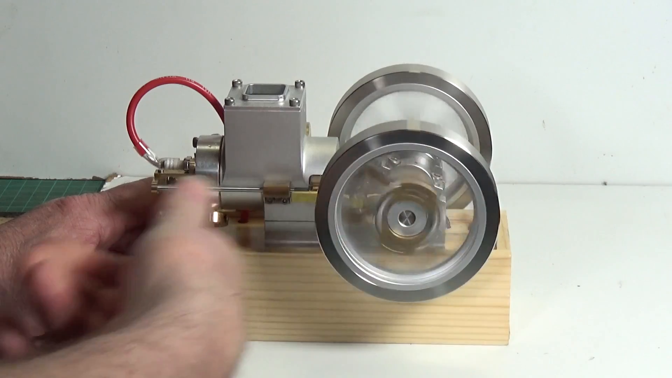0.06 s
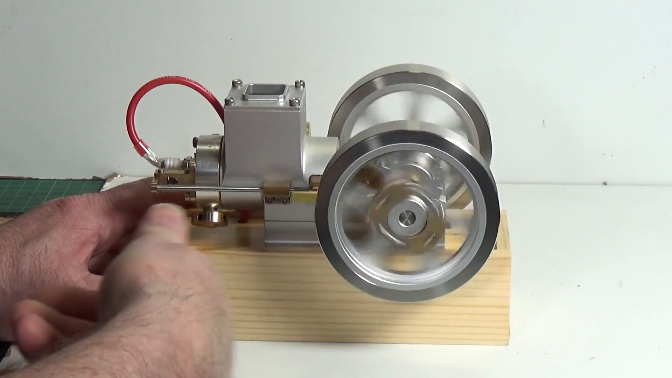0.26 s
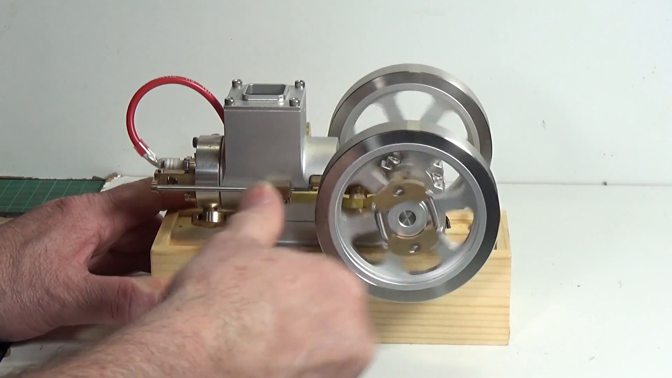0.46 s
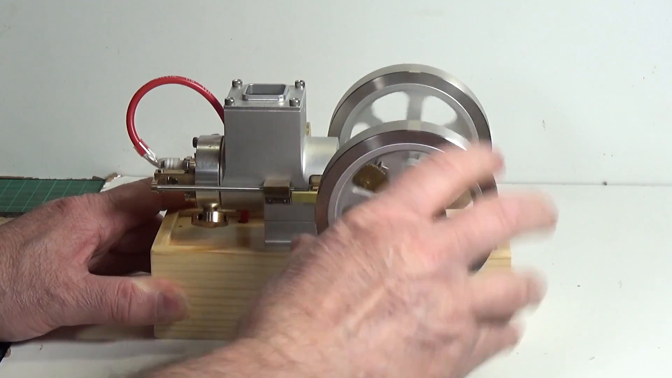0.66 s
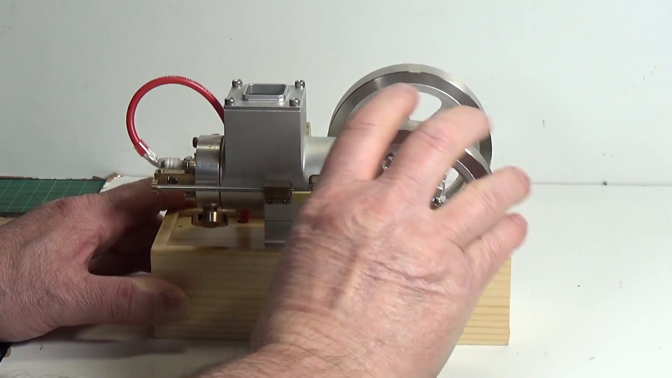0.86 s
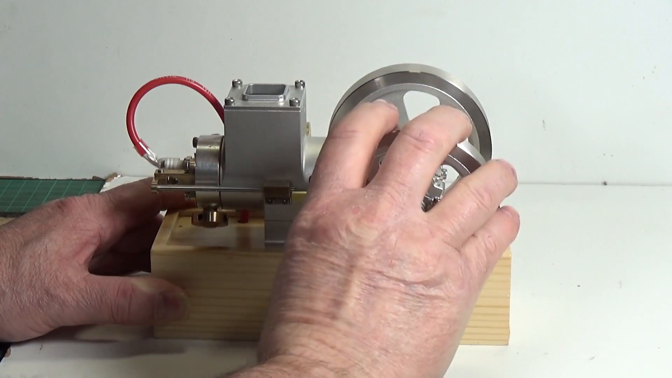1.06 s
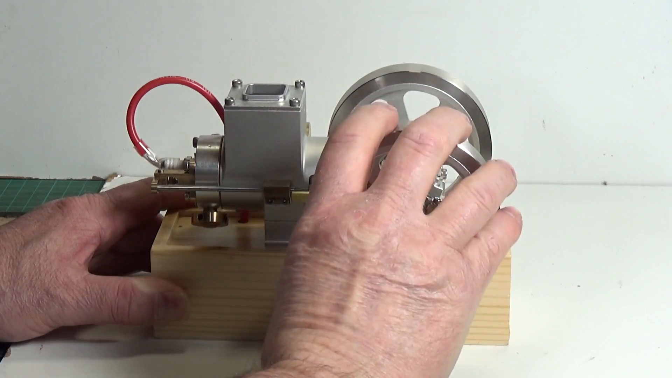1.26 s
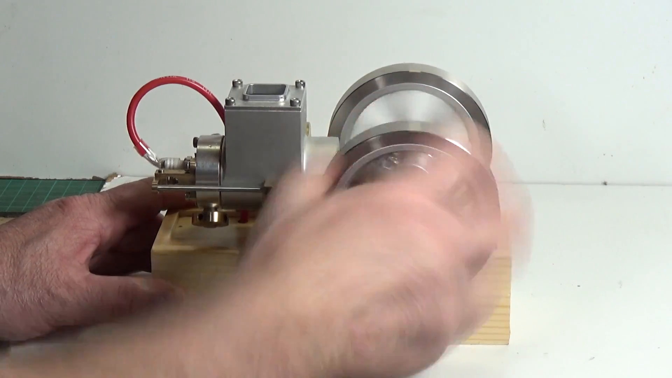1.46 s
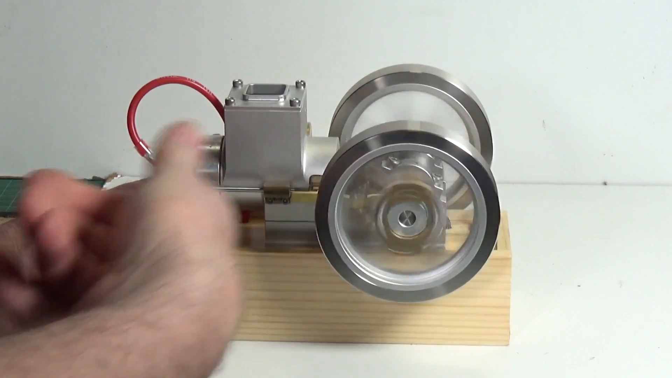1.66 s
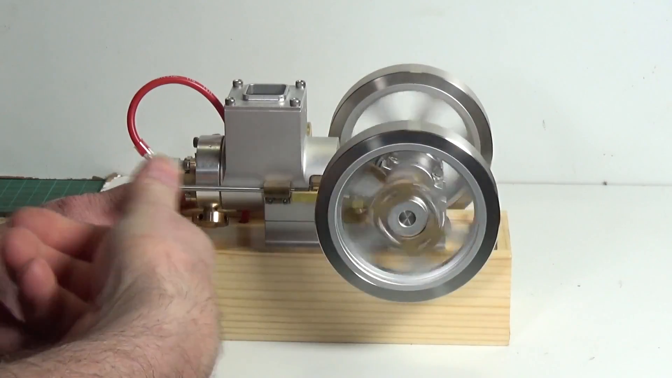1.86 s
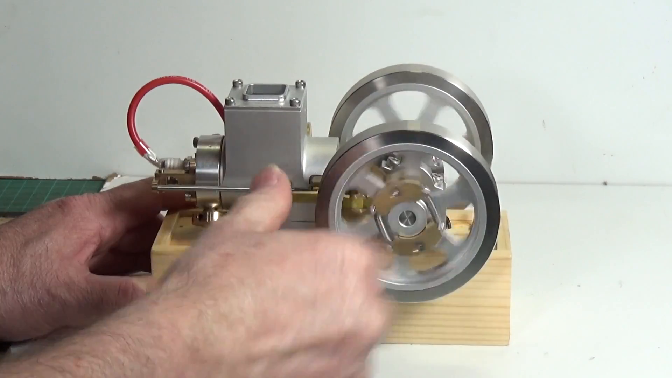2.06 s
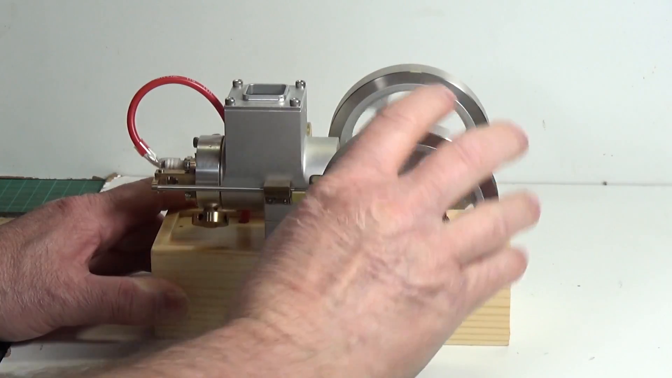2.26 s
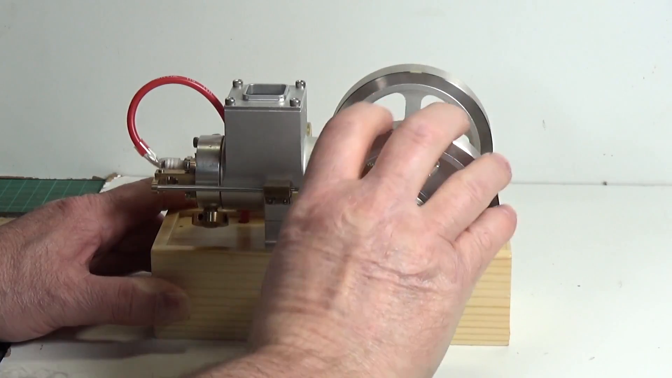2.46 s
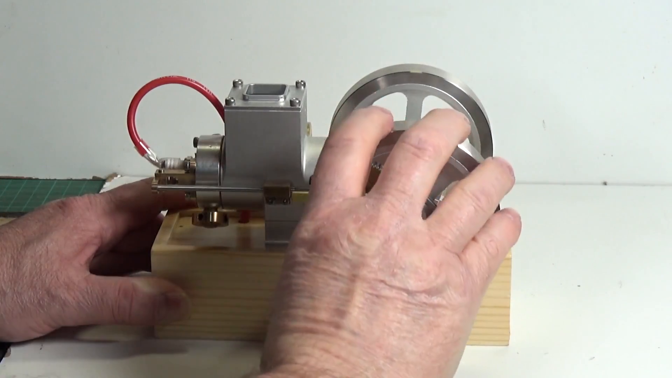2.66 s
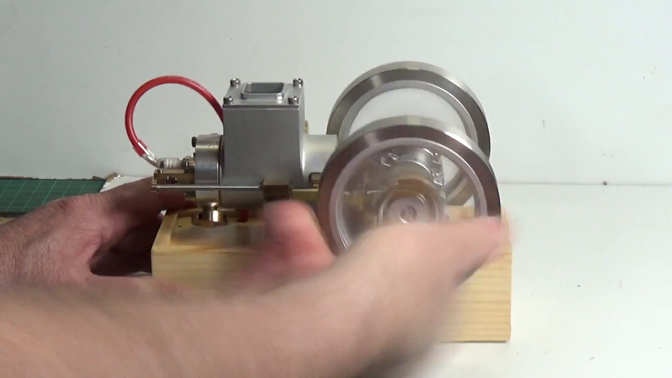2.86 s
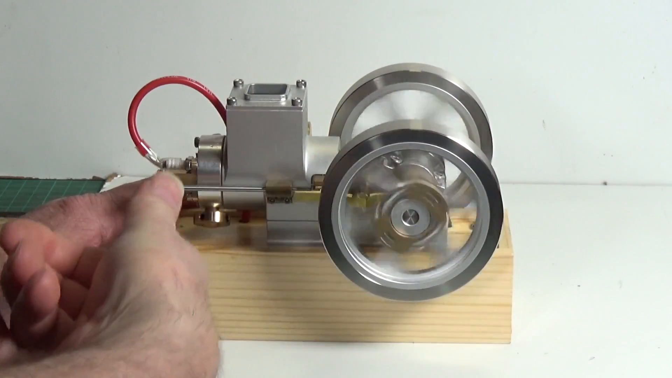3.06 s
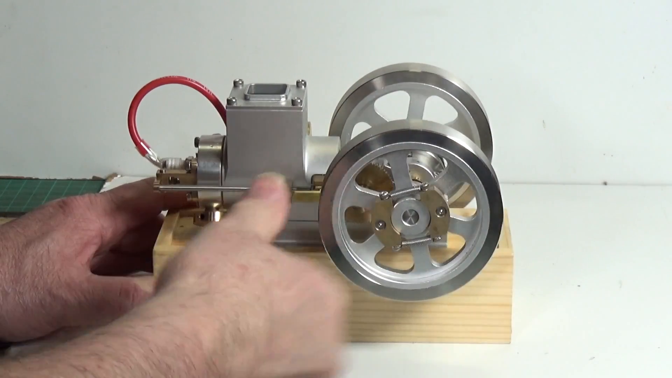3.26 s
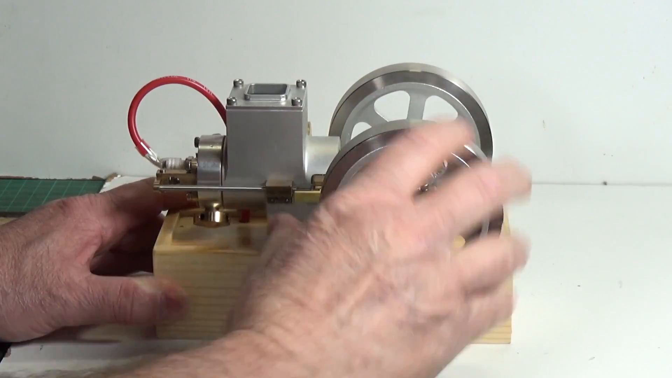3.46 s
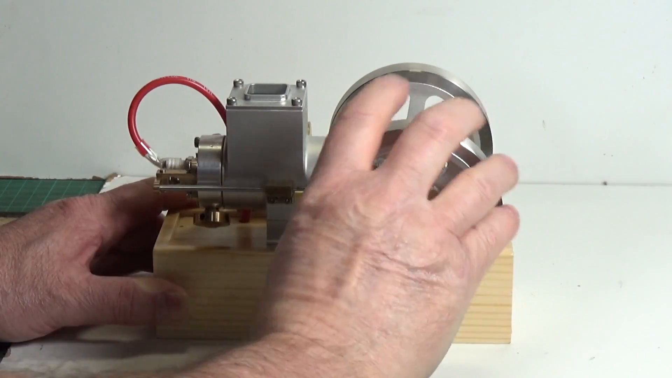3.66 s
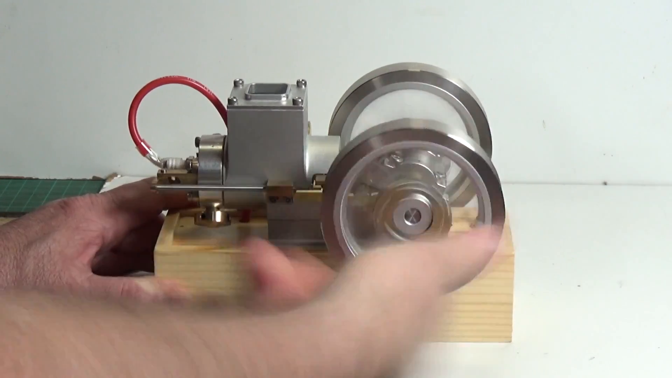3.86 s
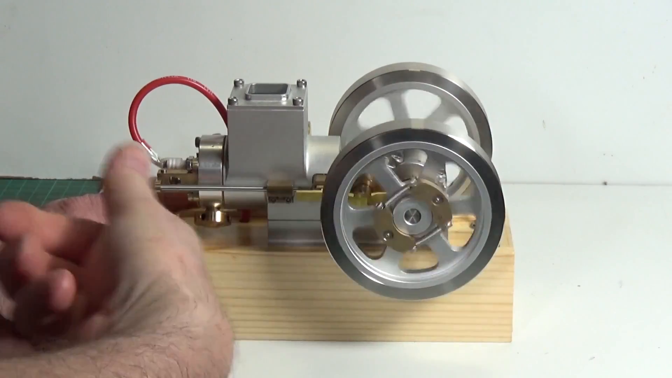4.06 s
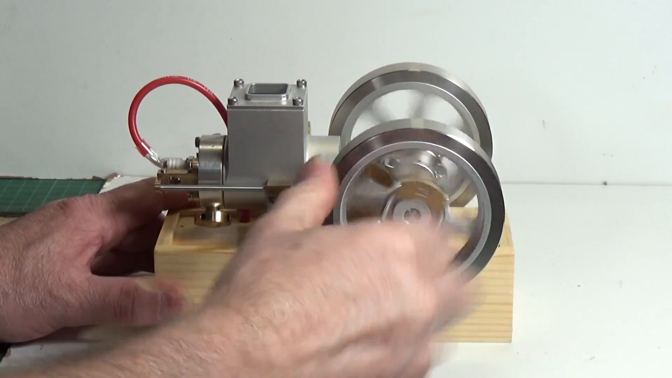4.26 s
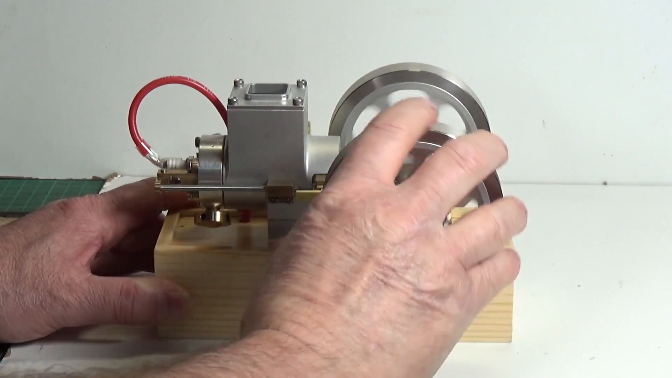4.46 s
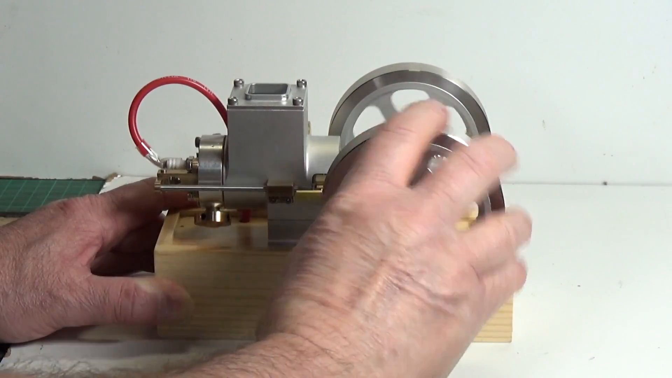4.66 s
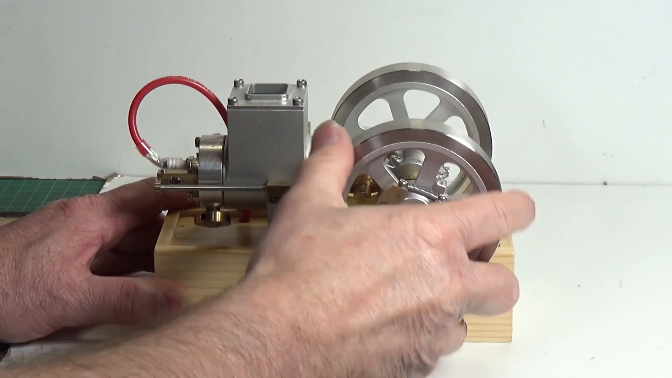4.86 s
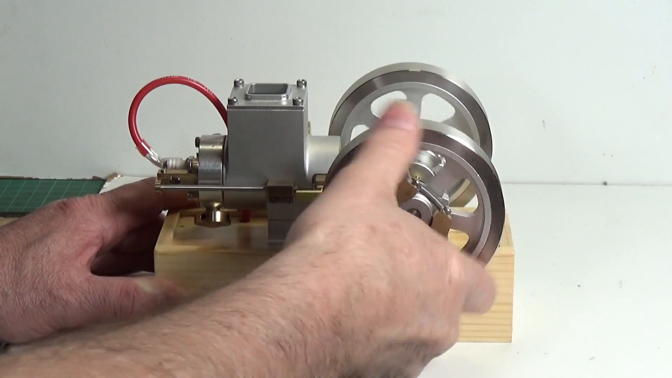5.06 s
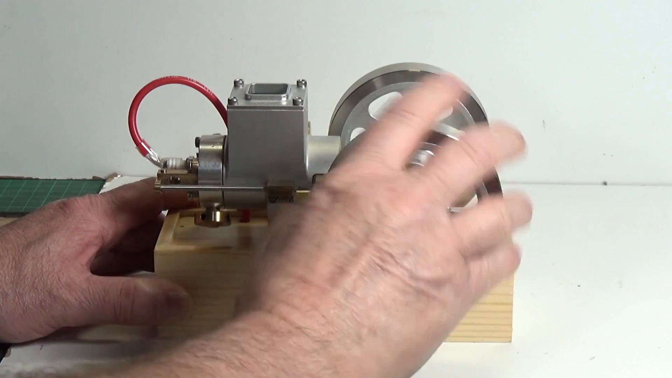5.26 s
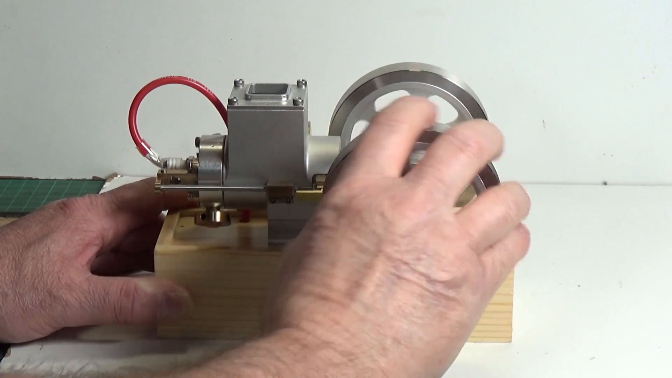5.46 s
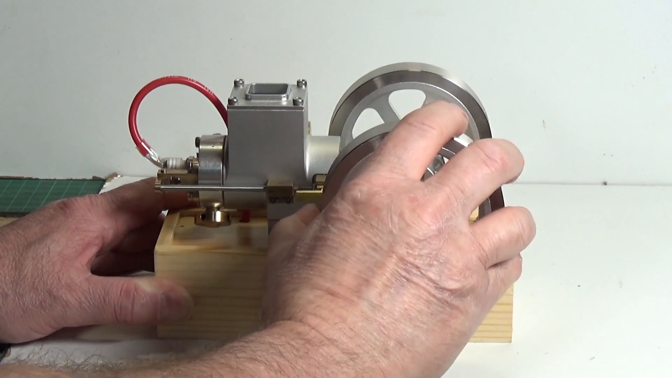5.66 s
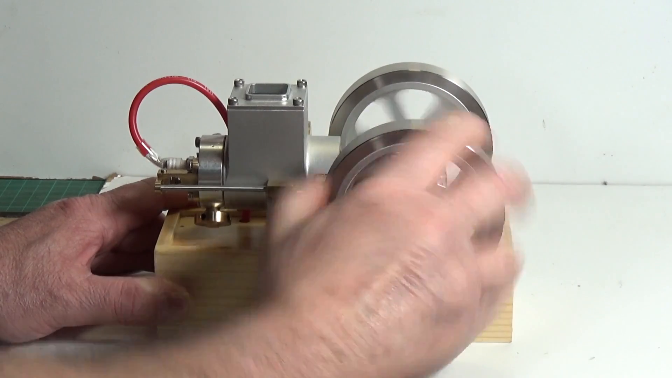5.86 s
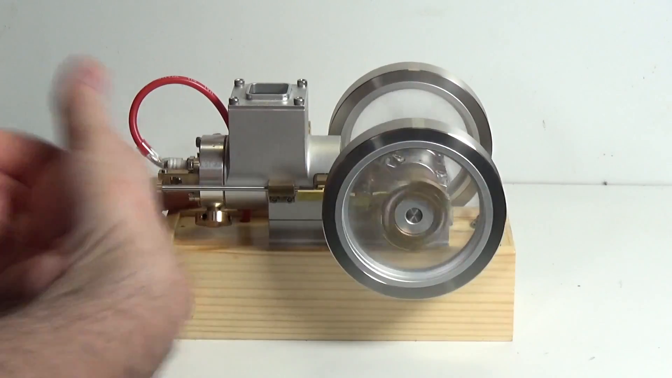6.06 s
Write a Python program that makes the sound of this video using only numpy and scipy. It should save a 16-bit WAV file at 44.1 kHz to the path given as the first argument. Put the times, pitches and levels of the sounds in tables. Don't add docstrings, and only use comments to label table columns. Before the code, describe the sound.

Short, hard bursts of wooden rattle and bright metal clatter from a hand-turned model engine, with airy hisses and quiet coasting gaps between.

```python
import sys
import numpy as np
from scipy import signal
from scipy.fft import rfft, irfft, next_fast_len
from scipy.io import wavfile
from scipy.ndimage import uniform_filter1d, map_coordinates

SR = 44100
rng = np.random.default_rng(int(sys.argv[2]) if len(sys.argv) > 2 else 0)


def gain_from_db(level_db):
    decades = np.asarray(level_db, float) / 20
    return 10 ** decades


def transcribe(u):
    v = np.clip(np.atleast_2d(u).T, -1, 1)
    q = np.round(v * 32767).astype(np.int16)
    wavfile.write(sys.argv[1], SR, q)


N = 269451
CONTROL_S = np.arange(0, N / SR + .002, .001)

# start_s, peak_s, let_go_s, peak_db, let_go_db
STROKES = [(-.05, 0, 0.051, -13.5, -24), (.04, .09, 0.18, -23.5, -23), (.241, .303, .46, -25.5, -32),
           (.69, .74, 0.71, -40, -39), (1.46, 1.53, 1.73, -23.5, -19), (1.572, 1.6, 1.827, -11, -31),
           (1.86, 1.922, 2.07, -25.5, -36), (2.12, 2.17, 2.24, -27.5, -46), (2.25, 2.325, 2.43, -35, -45.5),
           (2.865, 2.939, 2.96, -9.5, -16.5), (2.96, 3.015, 3.053, -14, -23),
           (3.86, 3.883, 3.955, -15.5, -17.5), (3.94, 3.987, 4.075, -17, -21.5),
           (4.16, 4.212, 4.27, -25.5, -34), (4.96, 5.0, 5.08, -35.5, -42.5),
           (5.95, 6.022, 6.23, -11.5, -25), (6.05, 6.108, 5.5, -13, -12)]
# start_s, peak_s, let_go_s, peak_db, let_go_db
TURNS = [
    (1.4, 1.44, 0.75, -53, -43),
    (2.4, 2.5, 2.9, -53, -47),
    (2.72, 2.806, 3.06, -40, -25),
    (3.1, 3.2, 4, -42.5, -48.5),
    (3.75, 3.84, 3.7, -36.5, -28),
    (5.2, 5.25, 5.4, -60, -41.5),
    (5.5, 5.555, 5.8, -40.5, -48.5),
]
# time_s, peak_db, pitch_hz
KNOCKS = [(0.263, -18.5, 393), (0.558, -17.5, 232), (0.72, -28.5, 560), (0.774, -25.5, 310),
          (0.858, -32, 242), (0.907, -21, 300), (1.117, -33.5, 600), (1.418, -24, 244), (1.48, -22, 235),
          (1.547, -3, 590), (1.591, -4, 760), (1.909, -8.5, 365), (2.033, -14.5, 243), (2.167, -19.5, 550),
          (2.283, -21, 320), (2.455, -22, 255), (2.772, -27, 420), (2.868, -11.5, 650),
          (3.809, -22.5, 305.2), (3.862, -11, 208), (4.197, -11, 388), (4.293, -11, 296), (4.471, -18, 535),
          (4.682, -24, 288), (4.847, -20, 566), (5.159, -13, 304), (5.446, -10.5, 652),
          (5.884, -13.5, 618.4), (5.956, -14, 622), (6.023, -5, 550)]
# time_s, peak_db, pitch_hz
MORE_KNOCKS = [
    (1.357, -39, 443),
    (1.509, -14.5, 780),
    (3.777, -39, 245),
    (4.441, -21.5, 234),
    (5.83, -31.5, 150),
]
# time_s, peak_db, pitch_hz
BUMPS = [(0.004, -7.0, 588), (0.022, -16, 513), (0.032, -22, 577), (0.059, -16.0, 600.0),
         (0.081, -11.5, 310.0), (0.111, -20, 433), (0.132, -16.0, 380.0), (0.161, -18, 356),
         (0.189, -15, 460.0), (0.204, -14.0, 360.0), (0.29, -17.5, 520.0), (0.305, -12, 400.0),
         (0.342, -24, 400.0), (0.785, -28, 353), (0.949, -28, 330.0), (1.428, -25, 450), (1.437, -30, 626),
         (1.598, -7, 380.0), (1.61, -9, 605), (1.646, -12.5, 710), (1.671, -17, 585), (1.691, -8.5, 428),
         (1.719, -15, 420.0), (1.74, -14, 577), (1.755, -16, 444), (1.995, -21.0, 334), (2.242, -34, 620.0),
         (2.85, -19.0, 540.0), (2.905, -5.0, 610.0), (2.931, -5, 560), (2.942, -10.5, 560.0),
         (2.983, -14, 744), (3.003, -13, 420), (3.018, -18, 385), (3.044, -16, 820), (3.063, -17, 595),
         (3.087, -15.5, 618), (3.107, -14.5, 490.0), (3.144, -27, 393), (3.856, -16.5, 910),
         (3.879, -10.5, 664), (3.901, -6, 615), (3.911, -12, 560), (3.928, -12, 620.0), (3.988, -9, 340.0),
         (4.026, -17, 540), (4.049, -11.5, 583), (4.103, -28, 443), (4.72, -32, 570.0),
         (4.832, -29.0, 610.0), (4.912, -33.5, 591), (5.148, -28, 576), (5.214, -30, 380.0),
         (5.263, -29, 580.0), (5.964, -16, 570.0), (5.981, -16, 604), (6.006, -10.0, 510), (6.034, -8, 565),
         (6.07, -20, 520.0), (6.091, -10, 603),
         (.382, -18.5, 446), (1.622, -13, 556), (1.634, -10, 480), (1.785, -15, 300), (1.802, -19.5, 597),
         (1.895, -21, 620.1), (2.146, -27, 560), (2.534, -34, 300), (2.812, -29, 600), (2.883, -12.5, 516),
         (2.896, -9, 420), (3.033, -11, 298), (4.008, -16, 396), (4.066, -13.5, 455), (4.209, -17, 705),
         (4.226, -20, 328), (4.305, -20.5, 727), (5.169, -15, 556), (5.292, -30, 500), (5.894, -19, 300)]
# time_s, peak_db, pitch_hz
RAPS = [(0.018, -21, 1770.0), (0.086, -20, 1920.0), (0.402, -33.0, 1820.0), (0.449, -46, 1780),
        (0.906, -39, 2190), (1.478, -33, 2260.0), (1.548, -21, 1390.0), (1.561, -15, 1530),
        (1.588, -12, 1840), (1.66, -21, 2430.0), (1.694, -14.0, 1900), (1.73, -23.0, 1250),
        (1.801, -23.5, 1712), (1.954, -34, 1630), (2.03, -34, 1240), (2.054, -28.5, 1740.0),
        (2.072, -25.5, 1360), (2.315, -37, 1700.0), (2.639, -36, 2400), (2.806, -26.5, 1410),
        (2.87, -32, 1690.0), (2.888, -20, 1610.0), (2.96, -13, 1460.0), (2.973, -19.0, 1340.0),
        (3.001, -14, 1920), (3.011, -16, 1920), (3.02, -25, 1700), (3.052, -28, 1910.0),
        (3.087, -25, 1790.0), (3.113, -25, 1700.0), (3.806, -35, 2360.0), (3.923, -17.0, 1890),
        (3.949, -17, 1830), (3.99, -17.0, 1850.0), (4.049, -19.5, 2340), (4.4, -40, 2350),
        (4.966, -36, 2230.0), (5.159, -37, 1980), (5.447, -36, 1410.0), (5.966, -19.5, 1820),
        (5.982, -15, 1830), (6.026, -11.0, 1920), (6.035, -7.5, 1850.0), (6.048, -11, 1770),
        (6.084, -12.0, 1840)]
# start_s, length_s, level_db, pitch_hz
GROANS = [(.33, 0.054, -22, 238), (1.47, 0.045, -26, 238), (2.311, .04, -27, 254),
          (3.09, 0.043, -20.5, 240), (3.166, 0.032, -36, 233), (4.989, 0.047, -31, 241.6),
          (5.087, 0.081, -34, 241), (5.454, 0.045, -33, 216), (.57, .1, -35, 120), (1.13, 0.086, -45, 118),
          (3.5, .1, -42, 118), (3.77, .05, -35.5, 122), (4.69, 0.059, -37.5, 150), (5.3, 0.05, -36, 126),
          (5.46, 0.078, -32, 125), (3.865, 0.032, -13, 206.5), (1.93, 0.063, -27, 164)]
# time_s, peak_db, ring_hz, crack_db, frame_db
TICKS = [(0.008, -25, 9400, -30, -10), (0.861, -42, 4970, -12, 0), (0.062, -21, 9530, -37, -10),
         (0.0739, -16, 5650, -26, 2.5), (0.332, -27, 8350, -15, -11), (1.5405, -14, 9500, -10, -1),
         (1.598, -11.5, 5260, -47, 7.5), (1.6717, -12.5, 9000, -28, -5), (2.226, -36, 9900, -19, 5),
         (2.7757, -21.5, 8500, -17, 3.5), (2.87, -11.5, 8300, -12, -21), (2.99, -11.5, 7440, -32, -3),
         (3.1208, -19.5, 7930, -16.5, -2), (3.887, -14, 6160, -22, 2), (3.9596, -11, 7200, -33, -9),
         (4.115, -23, 9700, -11, -15), (4.225, -16, 6760, -20.5, -24), (4.834, -27, 8700, -13, 1.5),
         (5.17, -13.5, 5038, -16.5, -4.5), (5.1852, -17.5, 5120, -17, -7), (5.453, -31.5, 5800, -6, -5),
         (5.9585, -19.5, 8100, -18, 2), (6.0196, -2, 10370, -21, -30.5), (6.075, -14, 10500, -2.5, 2)]
# time_s, peak_db, ring_hz, frame_db, frame_hz
CLANKS = [(0.0506, -23.5, 5600, 15, 1800), (0.1518, -15.5, 9400, 8, 1910), (0.3038, -27, 6390, 16, 1300),
          (0.3837, -29, 9300, 15.5, 1490), (0.5742, -47, 8100, 31.5, 1900), (1.572, -23, 8240, 10, 1690),
          (1.756, -17.5, 9040, 13.5, 1820), (1.912, -26, 6387, 13, 1780), (1.9394, -37, 6205, 4, 1670),
          (1.9918, -24.5, 6400, 11.5, 1750), (2.173, -44, 5640, 32, 1920),
          (2.9199, -23.5, 7050, 24.5, 1656), (2.9333, -21, 5640, 15.5, 1820),
          (3.066, -19.5, 6250, 13, 1516), (3.8547, -14, 5480, 18, 1983), (3.8976, -17.5, 6600, 17, 1770),
          (3.971, -14, 5530, 9.5, 1840), (4.0418, -18.5, 6360, 12, 1970), (4.2048, -28, 6360, 16, 1820),
          (4.2875, -25.5, 5200, 14.5, 1830), (4.472, -49, 5800, 29.5, 2160), (5.885, -45, 8600, 19, 1520)]
# start_s, length_s, peak_db, rate_hz
FLUTTER = [
    (0.077, .058, -15, 207.3),
    (1.676, 0.087, -16.5, 205),
    (3.002, 0.044, -14.5, 218.8),
    (3.969, 0.055, -14, 200.2),
    (6.077, 0.076, -14.5, 204),
]
# time_s, hiss_db,
# jet_over_hiss_db
PUFFS = [(0, -39.5, -14), (.085, -40.5, -1), (1.554, -41, 0), (1.713, -40.5, 3), (2.373, -66, -4),
         (2.821, -38.5, -4.5), (2.889, -38, -7), (3.023, -40, 0.5), (3.87, -34, -8), (3.997, -41.5, 1.5),
         (4.224, -49, -16), (4.851, -60, -9), (5.084, -63, 4), (5.176, -53.5, -12), (5.462, -53.5, -14),
         (5.97, -33.5, -2.5), (6.04, -29.5, -23), (6.108, -30.5, 5)]
# start_s, end_s, low_bands_db, high_bands_db
LEAK = [
    (3.12, 3.81, -50, -47.5),
    (4.857, 5.86, -56, -78),
]
# start_s, end_s, first_db, last_db, upper_notes_db
SING = [(-.01, .245, -39, -46, -22), (.252, .635, -46, -62, -40), (.655, .98, -65, -73, -30),
        (1.543, 1.595, -36, -39, -20), (1.6, 1.69, -62, -60, 5), (2.35, 2.51, -62, -67, -5),
        (2.885, 2.915, -46, -48, -15), (3.89, 3.96, -47, -50, -20), (4.015, 4.2, -44, -53, -30),
        (4.25, 4.85, -61, -73, -20), (5.07, 5.17, -52, -55, -12), (5.2, 5.33, -63, -65, -4),
        (5.966, 6.02, -33, -39, -16), (6.026, 6.14, -40, -37, -5)]
# time_s, peak_db, pitch_hz, t60_s
GRIPS = [
    (0.895, -33.5, 2190, 0.081),
    (1.475, -27, 2220, 0.045),
    (2.6306, -32.5, 2320, 0.11),
    (3.2249, -35, 2250, 0.11),
    (3.8037, -28.5, 2370, 0.04),
    (4.385, -34.5, 2320, 0.12),
    (4.9591, -32, 2340, 0.069),
    (5.5495, -32.5, 2088, 0.081),
    (5.872, -38, 1480, .05),
    (5.915, -35, 1450, .15),
]
# time_s, level_db
HUM = [(0, -54), (.55, -51), (.95, -45), (1.36, -72), (2.0, -46), (2.35, -38), (2.8, -41), (3.0, -28),
       (3.45, -35), (3.75, -47.5), (5.0, -48.5)]

# pitch_hz, width_hz, level_db
TABLE = [(119.5, 35, -8), (171, 19.7, -7.5), (238.8, 23, -1.5), (295, 55, -6.5)]
# pitch_hz, width_hz, level_db
BLOCK = [(420, 101, -0.5), (503, 37.5, 1), (560, 67, -1), (661, 79, 1), (756, 115, -2.5), (884, 62, -4),
         (985, 109, -6)]
# pitch_hz, width_hz, level_db
FRAME = [(1300, 83, -0.5), (1473, 135, -0.5), (1820, 364, -1.5), (2004, 120, 2), (2237, 200, -2.5),
         (2670, 360, -7), (3350, 400, -12)]
# pitch_hz, width_hz, level_db
PORTS = [(6400, 360, -24), (8050, 350, -3), (9200, 370, 4)]
# pitch_hz, width_hz, level_db
LEAK_LOW = [(1975, 80, 9), (4000, 2500, -9), (6450, 250, -9), (8480, 200, -6)]
# pitch_hz, width_hz, level_db
LEAK_HIGH = [(9400, 200, 0), (10800, 200, -1), (11900, 200, -6), (14100, 120, -2)]
# pitch_hz, level_db
RIMS = [(8135, -2), (11560, -5), (12936, 0), (7795, -9)]
# frequency_hz, level_db_per_hz
AIR = [(2500, -0.5), (3500, 5.5), (6000, 4.5), (10000, -1.5), (11500, -38), (16000, -19)]
# frequency_hz, level_db_per_hz
JET = [(5000, -36), (8000, -4), (11000, -1), (13000, -8.5), (15000, 1), (15900, -15), (16300, -40)]
# frequency_hz, level_db_per_hz
ROOM = [(15, -36), (25, -15), (53, 8), (186, 4), (431, -12), (550, -18), (741, -5.5), (3120, -19),
        (4320, -22.5), (4810, -20.5), (15000, -24), (16300, -43)]
# frequency_hz, t60_s
WALLS = [(200, 0.27), (2000, 0.23), (10000, 0.12)]

RISE_DB, LET_GO_DB_PER_S = 16, 263
TABLE_SAG, TABLE_GROWS = 0.66, 0.71
STROKE_DB, TURN_DB, AFTER_DB = (-6.5, -3.5, -12.5), (-2, -0.6, -5.5), (-14.5, -19.5, -30.5)
SUCK_THUD_DB, SUCK_THRUM_DB = -7, -10
RUB_FLOOR_DB = -71.5


def spin():
    after = total_db(peak_db(s + 0.0083, db, rise=870, fall=124) for s, db, _ in KNOCKS + MORE_KNOCKS)
    suck = [peak_db(s + .015, db + SUCK_THRUM_DB, rise=550, fall=109) for s, _, db, _ in FLUTTER]
    turns, load = load_db(TURNS), load_db(STROKES)
    hardest = load.max()
    table_load = TABLE_GROWS * (load_db(STROKES, TABLE_SAG) - hardest) + hardest
    loads = (table_load, load, load)
    levels = [[loads[k] + STROKE_DB[k], turns + TURN_DB[k], after + AFTER_DB[k]] for k in range(3)]
    levels[0] += suck
    thrum_db, rattle_db, scrape_db = [per_sample(total_db(parts)) for parts in levels]

    fast = np.clip((rattle_db + 48.0) / 25, .2, 1)
    lumps = 0.79 + 2.0 * np.minimum(wobble(50), .7) * fast
    heavy = jolts(300, spread_db=1.5, noise=0.97)
    light = jolts(300, spread_db=4.5, noise=0.94)
    thrum = shaken(gain_from_db(thrum_db - 1.66 + lumps) * heavy, TABLE)
    rattle = shaken(gain_from_db(rattle_db + 0.5 + lumps) * heavy, BLOCK)
    scrape = shaken(gain_from_db(scrape_db + 1.94 * lumps) * patchy(light, depth_db=3.5), FRAME)
    return filtered(thrum + rattle, oil(3330)) + filtered(scrape, oil(5200))


def oil(hz):
    return lambda f: 1 / (1 + 1j * f / hz) ** 2


def backlash():
    out, t = np.zeros(N + SR), np.arange(SR // 10) / SR
    wood = (BUMPS, 5.5, .0015, .033, 1.45)
    metal = (RAPS, 5, .0004, .015, 1.2)
    for rows, lift_db, rise_s, t60, second in (wood, metal):
        for s, db, hz in rows:
            ratio, phase = second + .3 * rng.random(), rng.random()
            note = np.sin(2 * np.pi * hz * t) + 0.4 * np.sin(2 * np.pi * (ratio * hz * t + phase))
            envelope = gain_from_db(db + lift_db - 60 * t / t60) * (1 - np.exp(-t / rise_s))
            add_at(out, s, envelope * note)
    for s, length, db, hz in GROANS:
        swell = np.sin(np.pi * np.clip(t / length, 0, 1)) ** 0.93
        add_at(out, s, gain_from_db(db) * swell * np.sin(2 * np.pi * hz * t))
    return out[:N]


def thuds():
    out, block, t = np.zeros(N + SR), np.zeros(N + SR), np.arange(SR // 10) / SR
    slams = [(s, db + SUCK_THUD_DB, hz) for s, _, db, hz in FLUTTER]
    for s, db, hz in KNOCKS + MORE_KNOCKS + slams:
        late = s + 0.00087
        add_at(out, late, gain_from_db(db - 60 * t / 0.035) * np.sin(2 * np.pi * hz * t))
        add_at(block, late, gain_from_db(db + 14.5) * np.exp(-t / 0.00025))
    wood = modes(TABLE + BLOCK)
    return out[:N] + filtered(block[:N], lambda f: wood(f) * (1j * f / (170 + 1j * f)) ** 2)


def ticks():
    out, frame, t = np.zeros(N + SR), np.zeros(N + SR), np.arange(SR // 10) / SR
    valve_gear = [(*row, 1827) for row in TICKS]
    linkage = [(s, db, hz, -43, frame_db, frame_hz) for s, db, hz, frame_db, frame_hz in CLANKS]
    for s, db, hz, crack_db, frame_db, frame_hz in valve_gear + linkage:
        grit, blur, shock = rng.standard_normal((3, len(t)))
        crack = np.diff(grit, prepend=0) * gain_from_db(crack_db + 14.5 - 60 * t / 0.0061)

        ring = np.sin(2 * np.pi * hz * t)
        ring += 0.39 * np.sin(2 * np.pi * 6400 * t) + 0.41 * np.sin(2 * np.pi * 9400 * t)
        rough = 1 + 2.7 * uniform_filter1d(blur, size=8)
        ring_db = min(0, -21.0 - crack_db)
        ring = ring * rough * gain_from_db(ring_db - 60 * t / 0.023)

        dull = uniform_filter1d(uniform_filter1d(shock, size=7), size=5)
        snap = 4 * np.diff(dull, prepend=0) * gain_from_db(frame_db + 5 - 60 * t / 0.012)
        clank = np.sin(2 * np.pi * frame_hz * t) + 0.37 * np.sin(2 * np.pi * 1.49 * frame_hz * t)
        clank = clank * gain_from_db(frame_db + 3 - 60 * t / 0.027)
        add_at(out, s, gain_from_db(db - 11.5) * (ring + crack + clank + snap))
        add_at(frame, s, gain_from_db(db + frame_db + 5.5 - 60 * t / 0.0086) * shock)
    return out[:N] + filtered(frame[:N], modes(FRAME))


def flutter():
    out, t, unsteady = np.zeros(N), np.arange(N) / SR, 1 + 0.0395 * wobble(90)
    for start, length, top_db, hz in FLUTTER:
        db = top_db + np.interp((t - start) / length, [0, 0.45, 1], [-2, 0, -7])
        gate = np.clip(np.minimum(t - start, start + length - t) / 0.011, 0, 1)
        phase = 2 * np.pi * np.cumsum(hz * unsteady) / SR
        out += gate * gain_from_db(db + 2.0) * (np.sin(phase) - 0.29 * np.cos(2 * phase))
    return out


def air():
    load, t = load_db(STROKES), np.arange(N) / SR
    rub_levels = [-35.5 + 1.2 * (load - load.max()), RUB_FLOOR_DB]
    rub_levels += [peak_db(s, db, rise=410, fall=100) for s, db, _ in PUFFS]
    jet_levels = [RUB_FLOOR_DB - 8]
    jet_levels += [peak_db(s, db + jet, rise=410, fall=270) for s, db, jet in PUFFS]
    rub_db, jet_db = per_sample(total_db(rub_levels)), per_sample(total_db(jet_levels))

    ports = modes(PORTS)
    grains = jolts(590, spread_db=10.5, noise=1.2)
    rub = filtered(grains, lambda f: gain_from_db(along(AIR, f)) * (1.5 + np.abs(ports(f))))
    jet = filtered(rng.standard_normal(N), lambda f: gain_from_db(along(JET, f)))
    chop = 1 + 0.54 * np.sin(2 * np.pi * 208 * t + 2.1 * wobble(30))
    return gain_from_db(rub_db) * patchy(rub, depth_db=5) + gain_from_db(jet_db + 2.5) * chop * patchy(jet, depth_db=8.5)


def leak():
    t, low, high = np.arange(N) / SR, np.zeros(N), np.zeros(N)
    for start, end, low_db, high_db in LEAK:
        gate = np.clip(np.minimum(t - start, end - t) / 0.022, 0, 1)
        low += gate * gain_from_db(low_db - 2.6 * np.abs(t - start))
        high += gate * gain_from_db(high_db - 65 * np.abs(t - start))
    low_hiss = shaken(rng.standard_normal(N), LEAK_LOW)
    high_hiss = shaken(rng.standard_normal(N), LEAK_HIGH)
    return low * low_hiss + high * high_hiss


def flywheels():
    t, drift = np.arange(N) / SR, 0.98 * wobble(25)
    depth = np.interp(t, [0, .22, .3, 4.9, 5], [.8, .75, .25, .3, .6])
    beat = 1 + depth * np.sin(2 * np.pi * 30 * t + 2 * wobble(12))
    low = beat * np.sin(2 * np.pi * 4732 * t + drift)
    upper = sum(gain_from_db(db + 5.0 * wobble(14)) * np.sin(2 * np.pi * hz * t + drift) for hz, db in RIMS)
    out = np.zeros(N)
    for start, end, first_db, last_db, upper_db in SING:
        now = slice(max(0, round(start * SR)), round(end * SR))
        gate = np.clip(np.minimum(t[now] - start, (end - t[now]) / 3) / 0.0071, 0, 1)
        level = gain_from_db(2.0 + np.interp(t[now], [start, end], [first_db, last_db]))
        out[now] += gate * level * (low[now] + gain_from_db(upper_db) * upper[now])
    return out


def fingers():
    out, t = np.zeros(N + SR), np.arange(SR // 4) / SR
    for s, db, hz, t60 in GRIPS:
        puff = rng.standard_normal(len(t)) * gain_from_db(-40 * t / t60) * (1 - np.exp(-t / 0.0023))
        skin = modes([(hz, 250, 0), (.6 * hz, 800, -6)])(np.fft.rfftfreq(len(t), 1 / SR))
        add_at(out, s, gain_from_db(db + 17.0) * irfft(rfft(puff) * skin, len(t)))
    return out[:N]


def walls(x):
    hz, t, z = signal.stft(rng.standard_normal(SR // 2), SR, nperseg=256)
    decay = gain_from_db(-60 * t / along(WALLS, hz)[:, None])
    tail = signal.istft(z * decay, SR, nperseg=256)[1]
    return signal.fftconvolve(np.pad(x, (200, 0)), tail / np.linalg.norm(tail))[:N]


def background():
    t = np.arange(N) / SR
    hush = unit(filtered(rng.standard_normal(N), lambda f: gain_from_db(along(ROOM, f))))
    hum_db = np.interp(t, *np.transpose(HUM)) - 1.0 + 0.77 * wobble(4.93)
    hum = gain_from_db(hum_db) * np.sin(2 * np.pi * 57.5 * t + 0.62 * wobble(6.2))
    whistle = gain_from_db(-70) * np.sin(2 * np.pi * 15630 * t)
    return gain_from_db(-50.5 + 0.12 * wobble(3.9)) * hush + hum + whistle


def jolts(rate, spread_db, noise):
    hits = (rng.random(N) < rate / SR) * gain_from_db(spread_db * rng.standard_normal(N))
    return unit(unit(hits) + noise * rng.standard_normal(N))


def patchy(x, depth_db):
    z = signal.stft(x, nperseg=256)[2]
    field = uniform_filter1d(rng.standard_normal(z.shape), size=5, axis=0)
    field = uniform_filter1d(field, size=9, axis=1)
    return unit(signal.istft(z * gain_from_db(depth_db * unit(field)), nperseg=256)[1][:N])


def modes(table):
    def response(f):
        return sum((-1) ** k * gain_from_db(db) * 1j * f * width / (hz * hz - f * f + 1j * f * width)
                   for k, (hz, width, db) in enumerate(table))
    return response


def shaken(drive, table):
    body = modes(table)
    gain = np.sqrt(np.mean(np.abs(body(np.linspace(1, SR / 2, 4000))) ** 2))
    return filtered(drive, body) / gain


def filtered(x, response):
    m = next_fast_len(N + SR // 8, real=True)
    return irfft(rfft(x, m) * response(np.fft.rfftfreq(m, 1 / SR)), m)[:N]


def load_db(rows, sag=1):
    levels = []
    for start, peak, end, db, end_db in rows:
        let_go_db = db + sag * (end_db - db)
        times = [peak - 6 * (peak - start), peak, end, end + .5]
        points = [db - 6 * RISE_DB, db, let_go_db, let_go_db - .5 * LET_GO_DB_PER_S]
        levels.append(np.interp(CONTROL_S, times, points))
    return total_db(levels)


def peak_db(s, db, rise, fall):
    return db - np.maximum(rise * (s - CONTROL_S), fall * (CONTROL_S - s))


def total_db(levels):
    return 10 * np.log10(sum(gain_from_db(db) ** 2 for db in levels) + 1e-12)


def per_sample(control):
    return np.interp(np.arange(N) / SR, CONTROL_S, control)


def wobble(rate):
    knots = rng.standard_normal(int(N * rate / SR) + 4)
    return map_coordinates(knots, [np.arange(N) * rate / SR])


def along(points, hz):
    f, v = np.transpose(points)
    return np.interp(np.log(hz + 1), np.log(f + 1), v)


def unit(x):
    return x / np.sqrt(np.mean(x ** 2) + 1e-20)


def add_at(out, s, sound):
    at = round(s * SR)
    out[at:at + len(sound)] += sound


def scene():
    engine = spin() + backlash() + thuds() + ticks() + flutter() + air() + leak() + fingers()
    return (engine + gain_from_db(-12) * walls(engine) + flywheels() + background())[None]


def roll_off(x):
    return signal.sosfilt(signal.butter(12, 16510, fs=SR, output="sos"), x)


def record(dry):
    x = filtered(dry[0], lambda f: 1 / np.sqrt(1 + (f / 16000) ** 40))[None]
    mix = x / (1 + np.abs(x) ** 8) ** (1 / 8)
    return roll_off(mix)


dry = scene()
out = record(dry)
transcribe(out)
```